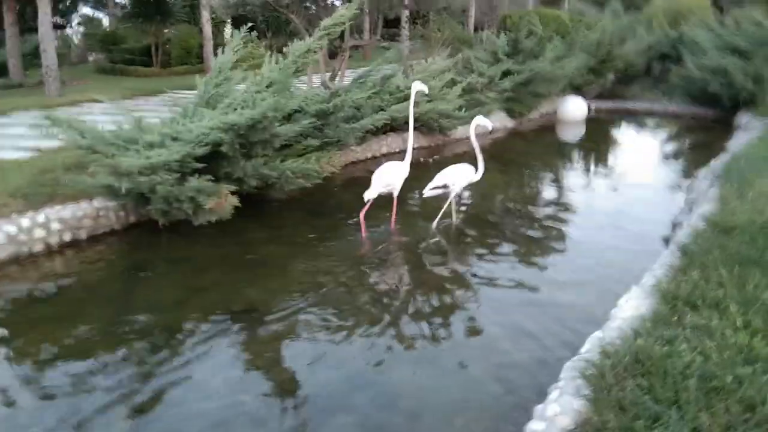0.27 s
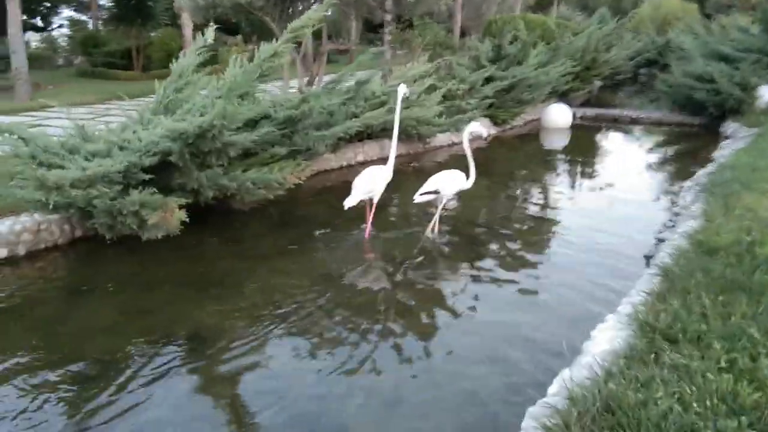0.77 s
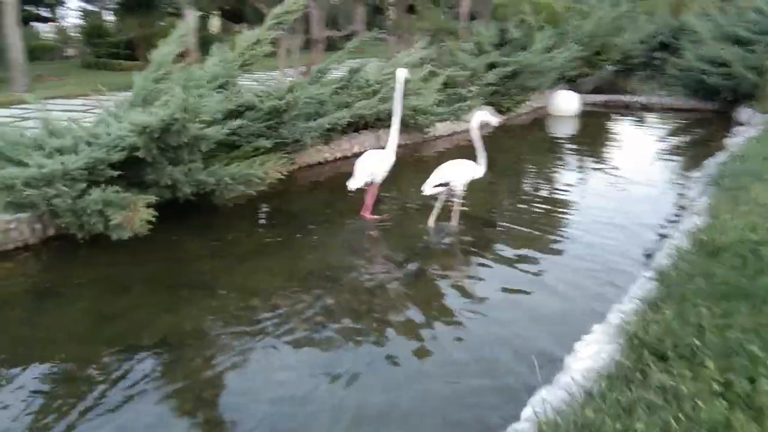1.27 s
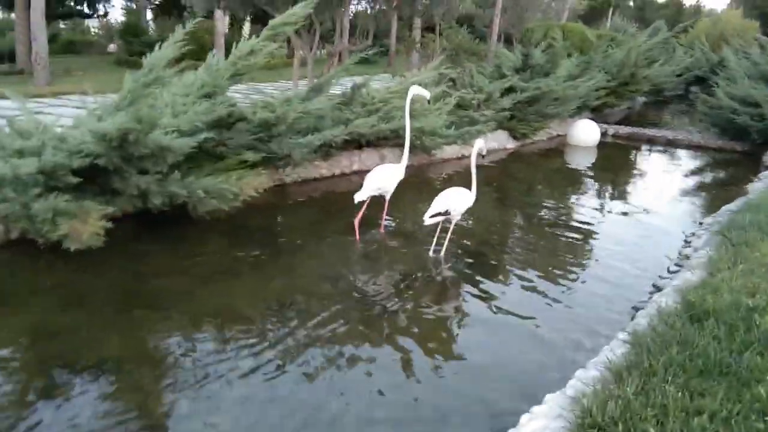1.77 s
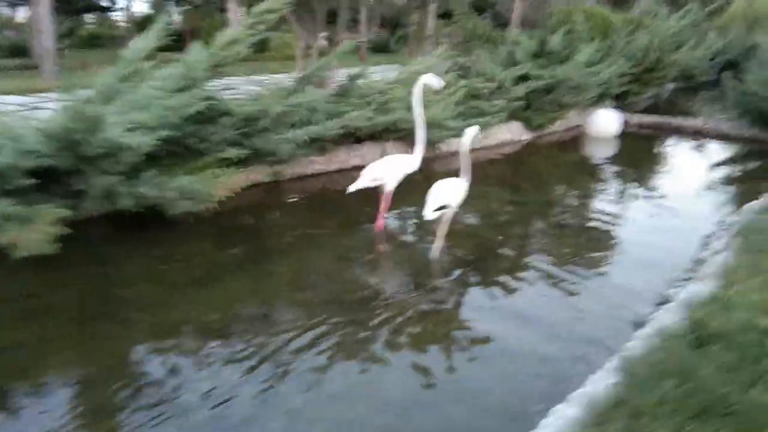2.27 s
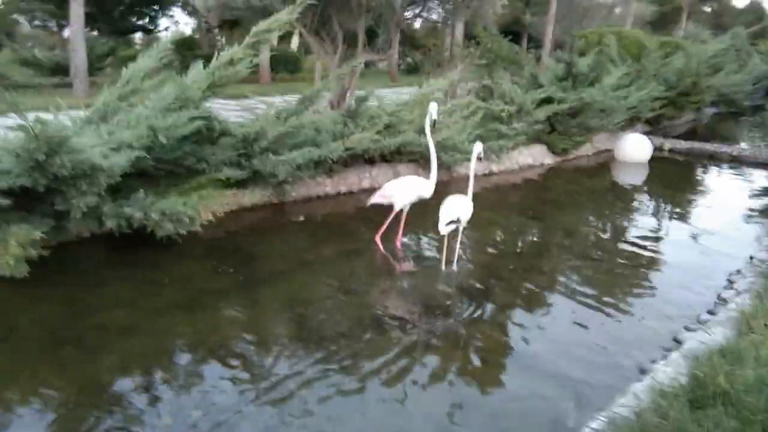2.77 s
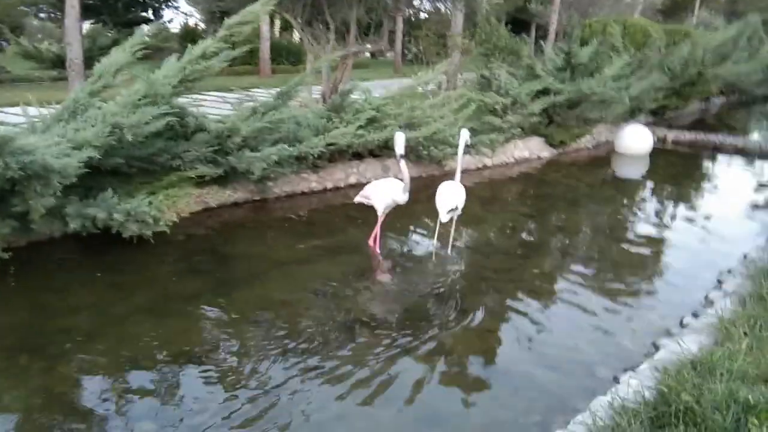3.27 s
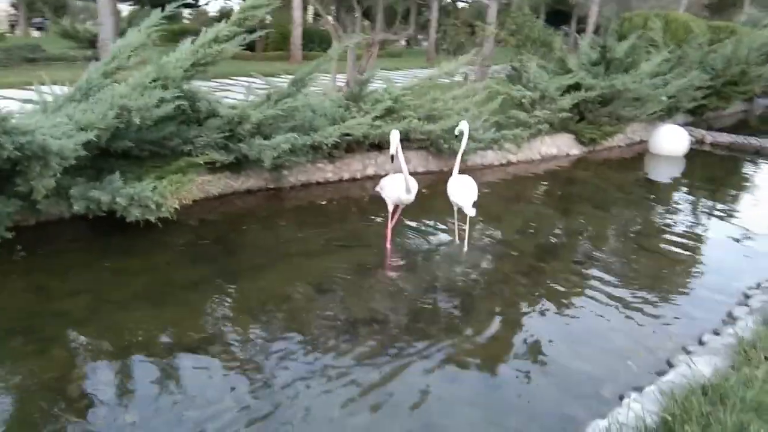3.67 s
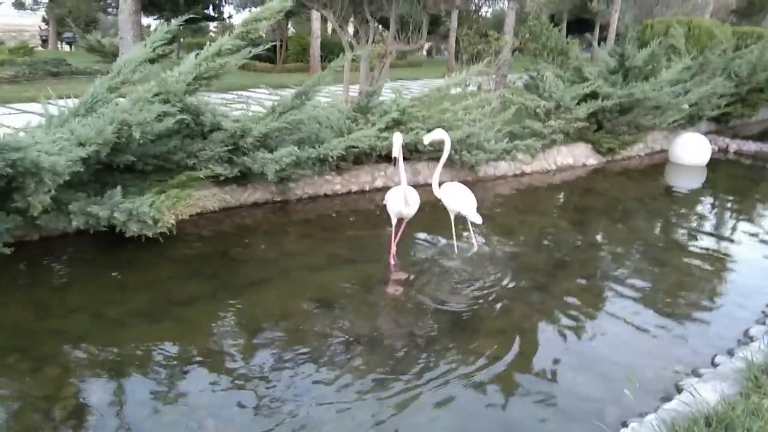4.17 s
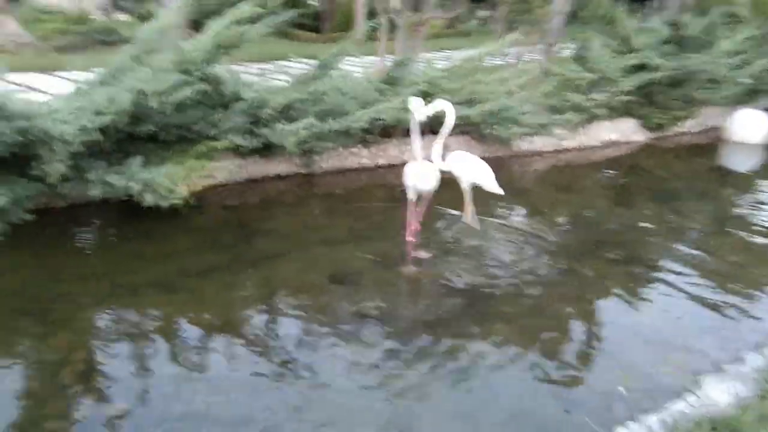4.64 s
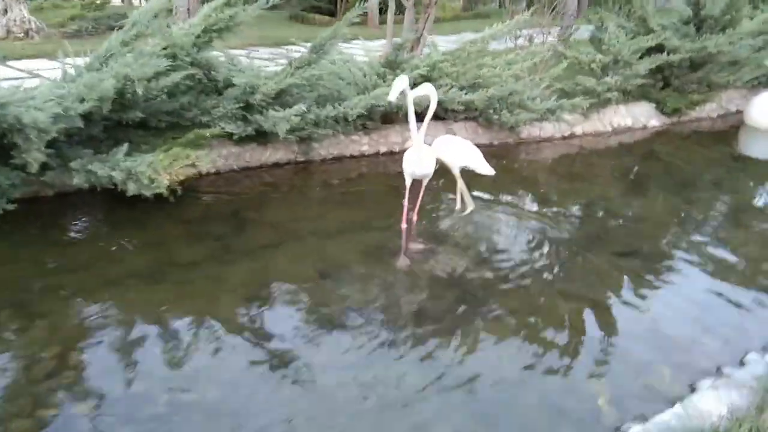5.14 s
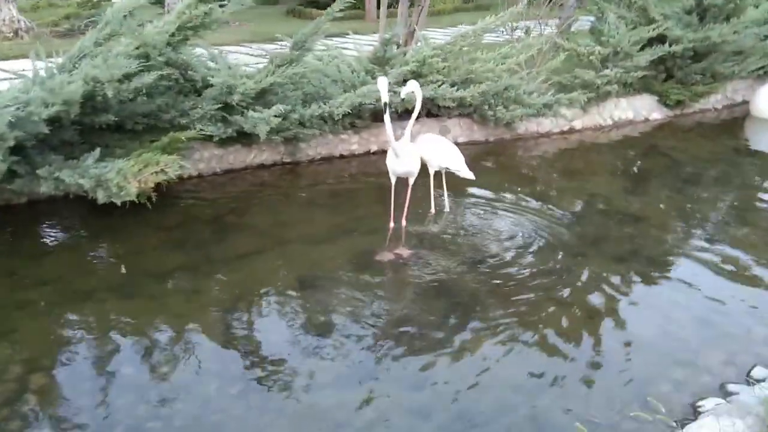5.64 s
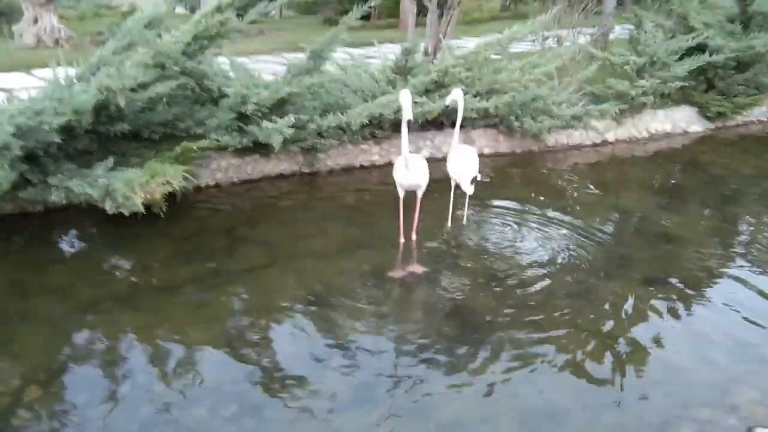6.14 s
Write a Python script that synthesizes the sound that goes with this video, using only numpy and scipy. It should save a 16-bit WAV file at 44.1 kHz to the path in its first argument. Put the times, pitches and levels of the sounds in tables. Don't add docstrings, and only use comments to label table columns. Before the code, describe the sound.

Short dry honking grunts from wading flamingos punctuate brushing footsteps on grass, with snapping stalks, small handling bumps and distant traffic rumble.

```python
import sys
import numpy as np
from scipy import signal
from scipy.fft import rfft, irfft, next_fast_len
from scipy.io import wavfile
from scipy.ndimage import uniform_filter1d

SR = 44100
rng = np.random.default_rng(int(sys.argv[2]) if len(sys.argv) > 2 else 0)


def rack_gain(trim_db):
    fader = np.asarray(trim_db, float)
    return 10 ** (fader / 20)


def output_pcm(signal):
    pcm = np.clip(np.atleast_2d(signal).T, -1, 1) * 32767
    wavfile.write(sys.argv[1], SR, np.round(pcm).astype(np.int16))


N = 282444


def colour(x, points):
    hz, db = np.transpose(points)
    n = next_fast_len(len(x))
    log_hz = np.log(np.arange(n // 2 + 1) * SR / n + 1)
    gain = rack_gain(np.interp(log_hz, np.log(hz), db, left=-60, right=-60))
    y = irfft(rfft(x, n) * gain, n)[:len(x)]
    return y / np.std(y)


def walk(rate):
    hold = int(SR / rate)
    steps = np.repeat(rng.standard_normal(N // hold + 1), hold)
    return 1.13 * uniform_filter1d(uniform_filter1d(steps, hold), hold)[:N]


def add(out, s, sound):
    i = int(s * SR)
    out[i:i + len(sound)] += sound[:N - i]


def ring(hz, db, t60, glide=0.):
    t = np.arange(int(t60 * SR) + 1) / SR
    return rack_gain(db - 60 * t / t60) * np.sin(2 * np.pi * hz * t * (1 + glide * t / t60))


# centre in seconds, rise over the rest level in dB, half-length in seconds.
TRAFFIC_SWELLS = [(.68, 4.1, 0.43), (2.3, 3, 0.25), (3.22, 3.7, 0.084), (3.75, 1.5, 0.39), (4.8, 4, 0.2),
                  (6.4, 3.2, 0.3)]


def traffic_db():
    t = np.arange(N) / SR
    swells = sum(db * np.exp(-((t - s) / half) ** 2) for s, db, half in TRAFFIC_SWELLS)
    return -59.5 + swells


# frequency in Hz, density in dB per Hz.
TOWN_SPECTRUM = [(15, -57), (25, 2), (43, -19), (58, -6.5), (86, 0.5), (189, -8), (253, -13), (442, -20),
                 (512, -16), (600, -19.5), (780, -81), (1320, -120)]


def town():
    return rack_gain(traffic_db() + 2.17 * walk(7.0)) * colour(rng.standard_normal(N), TOWN_SPECTRUM)


# frequency in Hz, density in dB per Hz.
RUSTLE_SPECTRUM = [(180, -14), (300, -13.5), (400, -7), (477, -12), (560, -6.5), (626, -2.5), (758, -4),
                   (1350, -6.5), (1710, -8.5), (3250, -13.5), (4130, -1), (5690, -7), (8210, -26.5),
                   (10400, -25), (13700, -40)]


def rustle():
    crackle = rng.standard_normal(N) * rack_gain(2.2 * walk(150) + 1.06 * walk(12))
    return rack_gain(-57.5) * colour(crackle, RUSTLE_SPECTRUM)


def sweep(s, db, drag, rise, fall):
    t = np.arange(N) / SR - s
    drag_loss = 17 * np.clip(t, 0, max(drag, 0))
    return rack_gain(db - rise * np.maximum(-t, 0) - drag_loss - fall * np.maximum(t - drag, 0)) ** 2


# loudest moment in seconds, level in dB, drag in seconds, top hiss against it in dB.
STRIDES = [(0.0, -46, 0.0, -23), (.76, -45, 0.054, -19), (1.63, -43, 0.011, -20.5),
           (2.33, -42.5, 0.029, -19), (3.039, -40.5, 0, -20), (3.72, -49.5, 0.26, -19.5),
           (4.62, -47.5, 0.034, -19), (5.42, -50, 0.11, -19), (6.26, -49, 0.024, -20.5)]
# loudest moment in seconds, level in dB, drag in seconds.
SCUFFS = [(.09, -55, 0.0092), (.19, -54.5, .03), (.61, -59, .005), (1.01, -52.5, .04), (1.09, -50, 0.034),
          (1.878, -49.5, 0.0044), (3.33, -60, 0.028), (3.44, -64, .01), (4.16, -57, 0.019),
          (4.44, -66, 0.033), (4.78, -55.5, 0.013), (5.69, -73, 0.047)]
# time in seconds, level in dB.
SETTLE = [(0, -58.5), (1.5, -60), (2.1, -66), (2.6, -60.5), (3.3, -58), (3.6, -63), (4.2, -61), (5.0, -60),
          (5.7, -74), (6.4, -61)]


def footwork():
    settle_s, settle_db = np.transpose(SETTLE)
    swish = rack_gain(np.interp(np.arange(N) / SR, settle_s, settle_db)) ** 2
    hiss = swish * rack_gain(-25.5) ** 2
    for s, db, drag, hiss_db in STRIDES:
        power = sweep(s, db, drag, rise=180, fall=116)
        swish, hiss = swish + power, hiss + power * rack_gain(hiss_db) ** 2
    for s, db, drag in SCUFFS:
        power = sweep(s, db, drag, rise=260, fall=232)
        swish, hiss = swish + power, hiss + power * rack_gain(-28.5) ** 2
    return np.sqrt(swish), np.sqrt(hiss)


# frequency in Hz, density in dB per Hz.
SWISH_SPECTRUM = [(350, -31), (600, -22), (709, -12), (837, -14), (1180, -14.5), (1680, -14.5),
                  (2830, -13.5), (4620, -4), (5450, 0.5), (6230, -6), (8500, -31.5), (11000, -73),
                  (18700, -120)]
HISS_SPECTRUM = [(4710, -19), (8000, -12), (8770, -15.5), (9930, -5), (11100, -6), (13000, -13.5),
                 (13700, -19)]


def grass():
    swish, hiss = footwork()
    struck = rng.random(N) < .15
    grains = rng.standard_normal(N) * rack_gain(2.3 * rng.exponential(size=N)) * struck
    flutter = rack_gain(2.3 * walk(60) + 0.93 * walk(25.004))
    grains = grains / np.std(grains) * flutter + .5 * rng.standard_normal(N)
    return rack_gain(0.5) * (swish * colour(grains, SWISH_SPECTRUM) + hiss * colour(grains, HISS_SPECTRUM))


# start in seconds,
# level in dB, frequency in Hz.
STALKS = [(0.01, -28, 5640), (0.017, -30.5, 4660), (0.067, -35, 5170), (0.0917, -30, 4970),
          (0.131, -35, 4960), (0.1997, -34, 5600), (0.2104, -33, 3820), (0.2254, -40, 5560),
          (0.3044, -38, 4800), (0.3854, -46, 4720), (0.398, -35, 5900), (0.546, -35, 5340),
          (0.603, -42, 5240), (0.993, -32, 5170), (1.238, -35.5, 5300), (1.378, -39, 6100),
          (1.7244, -41, 5000), (2.095, -35, 5350), (2.3774, -37, 5370), (3.928, -29, 3600),
          (4.8686, -43, 4160), (5.1302, -33.5, 4450), (5.5914, -39, 4060), (5.667, -36, 4690),
          (5.6874, -39, 5760), (5.7243, -37, 5600)]


def stalks():
    out = np.zeros(N)
    for s, db, hz in STALKS:
        add(out, s, ring(hz, db - 4, .007))
        add(out, s, ring(2.1 * hz, db - 26, .003))
    return out


# start in seconds, level in dB, frequency in Hz, # 60 dB
# decay in seconds.
BUMPS = [
    (0.565, -32, 116, 0.011),
    (2.735, -45, 95, 0.065),
    (4.672, -57, 120, 0.03),
    (4.776, -29.5, 87, 0.05),
    (4.789, -39, 72, 0.11),
    (5.43, -43.5, 76, 0.081),
    (6.197, -43, 71.6, .1),
    (6.249, -48, 75.4, 0.33),
]


def hand():
    out = np.zeros(N)
    for s, db, hz, t60 in BUMPS:
        add(out, s, -ring(hz, db, t60))
    add(out, 4.776, rack_gain(-43) * np.hanning(40))
    add(out, 4.791, rack_gain(-32.0) * np.hanning(18))
    return out


def tube(x, modes, factor):
    y = 0
    for k, (hz, width, db) in enumerate(modes):
        width = max(width, .045 * hz)
        r, w = np.exp(-np.pi * width / SR), 2 * np.pi * hz * factor / SR
        ringing = signal.lfilter([0, 1], [1, -2 * r * np.cos(w), r * r], x)
        y = y + (-1) ** k * rack_gain(db) * np.sin(w) * ringing
    return y


THROAT = {"bowed": [(734, 107, -1.5), (1240, 150, 3.5), (2210, 230, -5)], "away": [(670, 250, -5),
          (1176, 194, 7), (1420, 340, -17), (1750, 320, -10)], "stretched": [(647, 110, -10.5),
          (1036, 62, 4.5), (1253, 114, -1), (1615, 79, 3)], "curled": [(820, 300, 4), (921, 87, 4),
          (1356, 50, 2), (1840, 150, 1)]}
BEAK = {"bowed": [(2440, 300, 1), (4140, 170, 2), (5400, 450, -4)], "away": [(2340, 180, 4.5),
        (2610, 470, 0.5), (3140, 280, -2), (4300, 130, -1.5), (5540, 500, -16)],
        "stretched": [(2226, 88, -0.5), (2880, 150, -5.5), (3390, 160, -1), (4070, 190, 3.5),
        (5540, 410, -3.5), (7200, 440, -20.5), (8340, 410, -28), (11200, 930, -24.5)],
        "curled": [(2230, 160, -2), (2640, 260, 7.5), (3350, 110, 0.5), (3700, 180, 4), (4140, 105, 5.5),
        (5660, 210, -4.5), (6960, 430, -11), (8360, 500, -24), (11000, 730, -20)]}
BREAST = {"bowed": [(128, 64, -17), (225, 55, -20), (603, 180, -43)], "away": [(125, 110, -13.5),
          (245, 70, -19), (560, 94, -23)], "stretched": [(128, 32, -26), (280, 80, -31.5),
          (536, 97, -19.5)], "curled": [(132, 97, -18.5), (243, 35, -23.5), (497, 210, -23.5)]}
BOUNCES = {"bowed": [(.8, -.9), (1.3, .8), (2.56, .7)], "away": [(.9, -.9), (1.8, .8), (2.56, .7)],
           "stretched": [(1.3, -.8), (1.8, .6), (3.0, 1.1), (3.9, -.4)], "curled": [(.9, -1), (2.0, 1),
           (3.1, -.6)]}


def snap(db, soft_db, beak_db, factor, neck):
    factor = factor * (1 + .012 * rng.standard_normal())
    push, back, sharp = np.zeros((3, int(.04 * SR)))
    width = int(.00045 * SR)
    push[:width] = np.hanning(width) / 8
    for delay_ms, share in BOUNCES[neck]:
        place = int((delay_ms / factor + .045 * rng.standard_normal()) * SR / 1000)
        back[place] += share
        sharp[place] += share * rack_gain(1.5 * rng.standard_normal())

    ms = np.arange(len(push)) * 1000 / SR
    choke = .1 + .9 * np.exp(-(np.maximum(ms - 4.3, 0) / 1.1) ** 2)

    throat = 0.34 * tube(push + 0.21 * back, THROAT[neck], factor)
    cycle = np.sin(np.linspace(0, 2 * np.pi, 2 * width)) * np.linspace(1, .3, 2 * width)
    throat[:2 * width] += .3 * cycle
    dulling_db = 0.64 * min(soft_db - 1.5, 0)
    beak = rack_gain(beak_db - 5.5 + dulling_db) * tube(sharp, BEAK[neck], factor)
    breast = tube(push, BREAST[neck], factor)
    return rack_gain(db) * (throat * choke ** .65 + choke * beak + breast)


ARCH = {"bowed": (-6.5, -3), "away": (-20.5, -9.5), "stretched": (-14.5, -4.5), "curled": (-12.5, -3.5)}
REBOUND = {"away": (-5, -4), "bowed": (-6, -2), "stretched": (12.5, -27), "curled": (-4, -5)}


def grunt(out, first, last, loudest, period_ms, knock, top_db, beak_db, factor, knock_db, neck):
    at = np.linspace(first, last, int(round((last - first) * 1000 / period_ms)) + 1)
    rise_db, fall_db = ARCH[neck]
    rise = np.clip(1.2 * (loudest - at) / (loudest - first), 0, 1) ** 1.5
    fall = np.clip((at - loudest) / (last - loudest), 0, 1) ** 1.6
    soft_db = rise_db * rise + fall_db * fall

    start_db, change_db = REBOUND[neck]
    twin_db = start_db + change_db * (at - first) / (last - first)
    twin_db[0] = -5
    for s, soft, twin in zip(at, soft_db, twin_db):
        add(out, s, snap(top_db + soft, soft, beak_db, factor, neck))
        rebound = snap(top_db + soft + twin - 3.5, soft + twin, beak_db - 0.5, factor, neck)
        add(out, s + .0049, rebound)
    add(out, knock, snap(knock_db, 1.26 * (knock_db - top_db), beak_db, factor, neck))


# first snap, last snap and loudest moment in seconds, period in milliseconds,
# trailing knock in seconds.
GRUNTS = [
    (.7878, .8822, .843, 15.7, .9035),
    (2.2345, 2.3405, 2.308, 15.1, 2.3645),
    (3.1315, 3.191, 3.168, 14.9, 3.2105),
    (3.5385, 3.597, 3.570, 14.7, 3.6125),
    (3.937, 3.9955, 3.972, 14.6, 4.0142),
    (5.2125, 5.2715, 5.252, 14.8, 5.306),
    (5.8505, 5.911, 5.896, 15.1, 5.9475),
    (6.3125, 6.3965, 6.355, 28, 6.3775),
]
# loudest level in dB, beak brightness in dB, throat pitch factor,
# trailing knock in dB.
VOICES = [(-25.5, -9, 0.992, -31.5), (-22.5, -3.5, 0.976, -35.5), (-20, 3.5, 0.976, -28),
          (-17, 1, 1.015, -30.5), (-16.5, 3, 1.027, -24), (-19.5, -7.5, 1.03, -27), (-19.5, -5, 1.002, -32),
          (-34, -13, 0.95, -37)]
NECKS = ["bowed", "away", "stretched", "stretched", "stretched", "curled", "curled", "bowed"]
# delay in milliseconds, level in dB.
BANKS = [(6.1, -23.5), (11.3, -17), (19.7, -53), (31.0, -33)]


def flamingos():
    out = np.zeros(N)
    for timing, voice, neck in zip(GRUNTS, VOICES, NECKS):
        grunt(out, *timing, *voice, neck)
    t = np.arange(int(.12 * SR)) / SR
    space = rack_gain(-44 - 60 * t / 0.2) * rng.standard_normal(len(t)) * (t > .003)
    space[0] = 1
    for ms, db in BANKS:
        space[int(ms * SR / 1000)] += rack_gain(db)
    return signal.fftconvolve(out, space)[:N]


# start in seconds, level in dB.
TINKLES = [
    (1.7455, -67),
    (1.7915, -54),
    (1.803, -59),
]
# frequency in Hz, level in dB, 60 dB decay in seconds.
BUCKLE_MODES = [(3400, -1, .03), (6900, 7, .035), (8550, 1, .035), (11300, -5, .03), (13000, -8, .03)]


def buckle():
    out = np.zeros(N)
    for s, db in TINKLES:
        for hz, mode_db, t60 in BUCKLE_MODES:
            add(out, s, ring(hz, db + mode_db, t60))
    return out


# start in seconds, level in dB, frequency in Hz, 60 dB decay in seconds.
DRIPS = [
    (4.115, -47.5, 666, 0.078),
    (2.72, -57, 2500, 0.037),
    (2.755, -54, 1400, 0.028),
]


def water():
    out = np.zeros(N)
    for s, db, hz, t60 in DRIPS:
        add(out, s, ring(hz, db, t60, glide=0.13))
    return out


def scene():
    return (town() + rustle() + grass() + stalks() + hand() + flamingos() + buckle() + water())[None]


def band_limit(x):
    return signal.sosfilt(signal.butter(12, 14290, fs=SR, output="sos"), x)


def record(dry):
    band = signal.butter(N=3, Wn=[48, 14200], btype="band", fs=SR, output="sos")
    mix = signal.sosfilt(band, dry)
    return band_limit(mix)


dry = scene()
out = record(dry)
output_pcm(out)
```